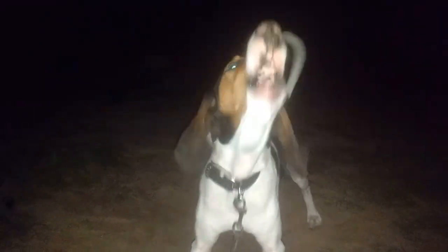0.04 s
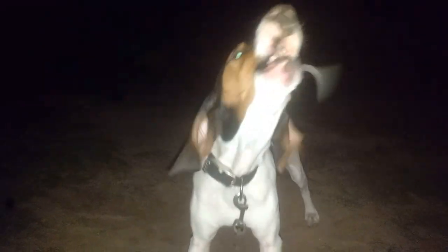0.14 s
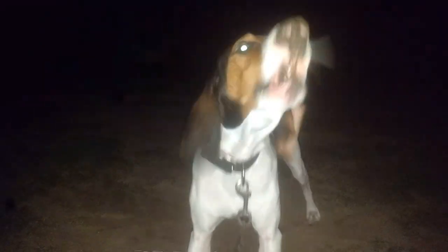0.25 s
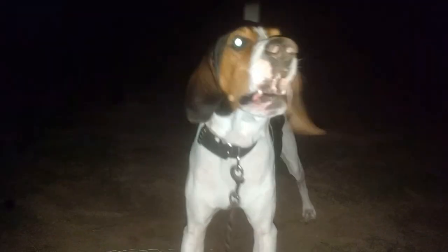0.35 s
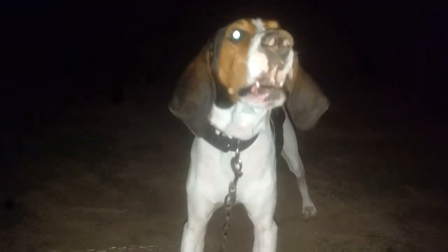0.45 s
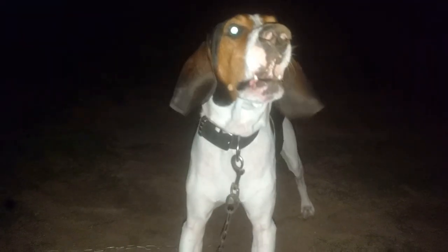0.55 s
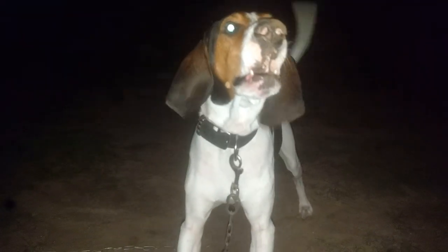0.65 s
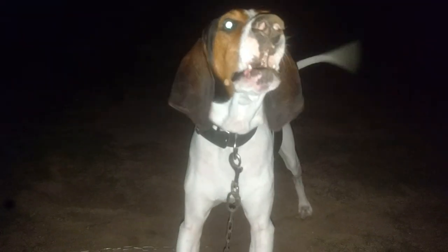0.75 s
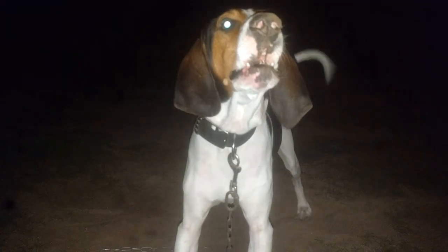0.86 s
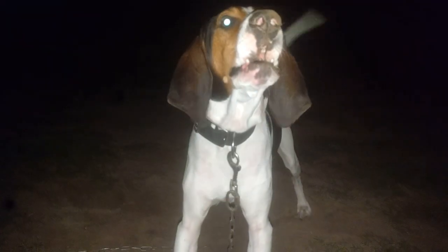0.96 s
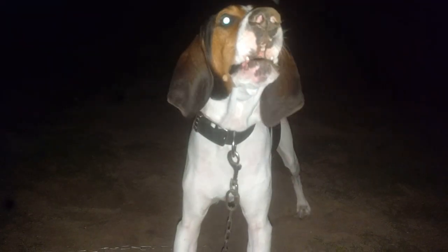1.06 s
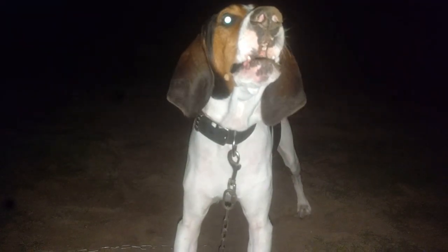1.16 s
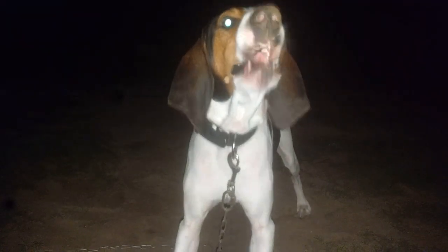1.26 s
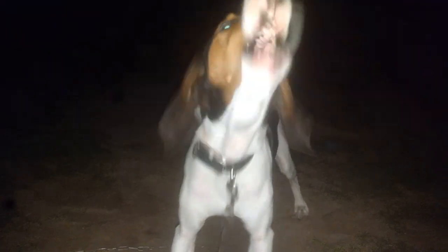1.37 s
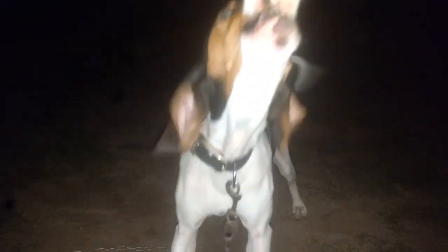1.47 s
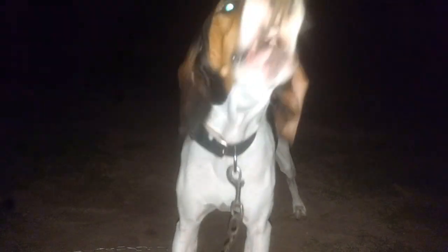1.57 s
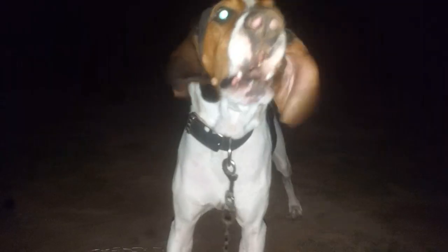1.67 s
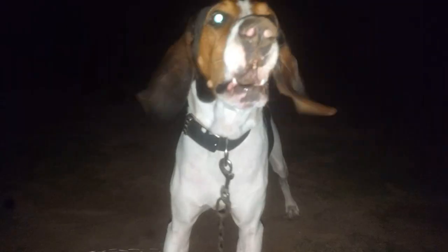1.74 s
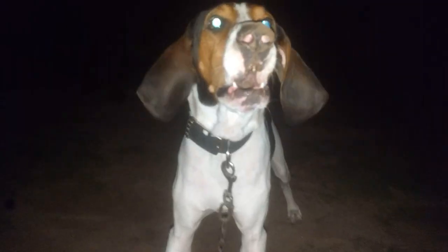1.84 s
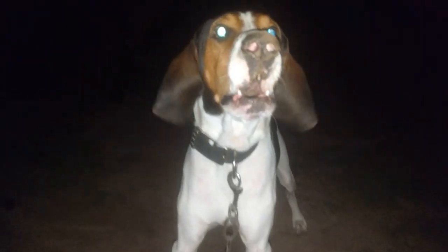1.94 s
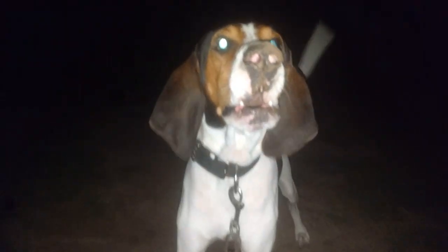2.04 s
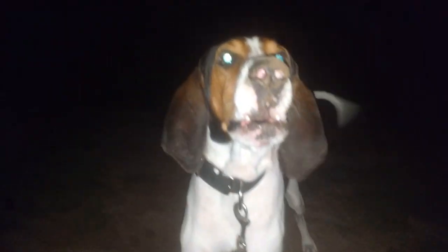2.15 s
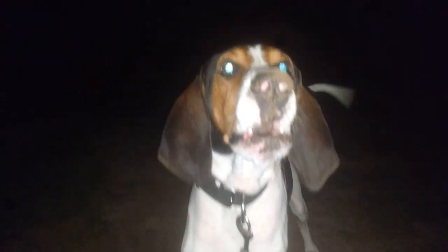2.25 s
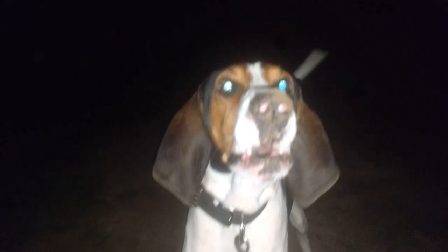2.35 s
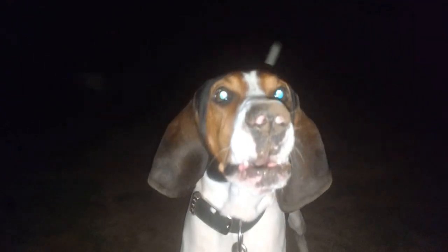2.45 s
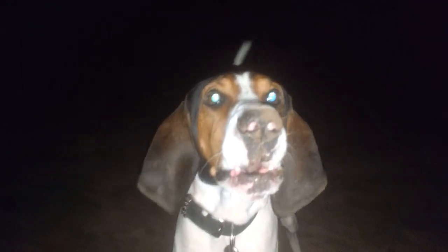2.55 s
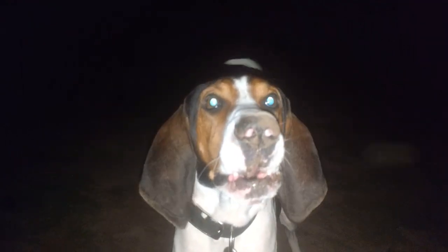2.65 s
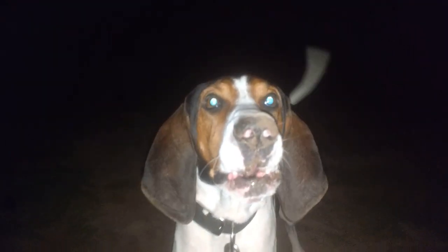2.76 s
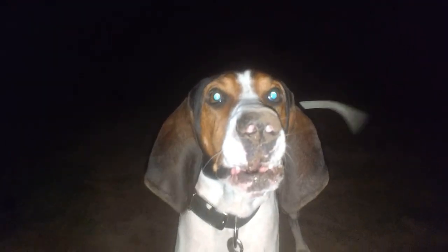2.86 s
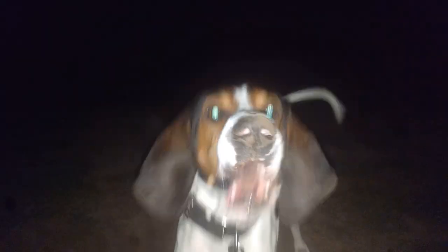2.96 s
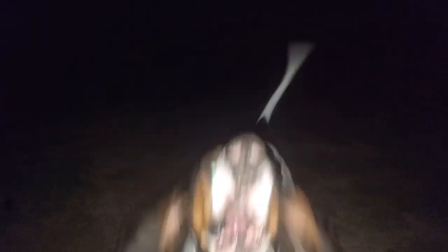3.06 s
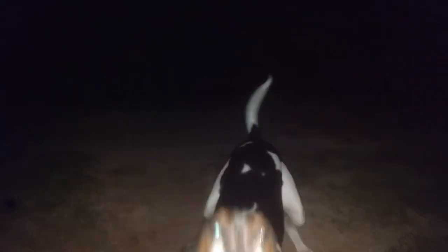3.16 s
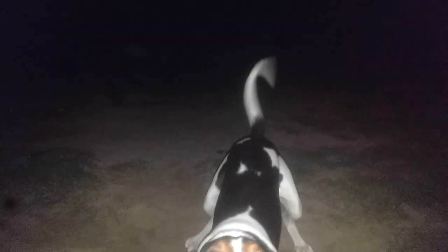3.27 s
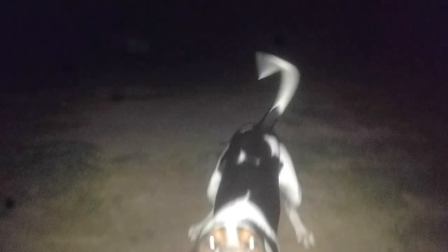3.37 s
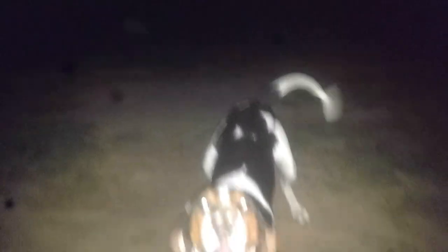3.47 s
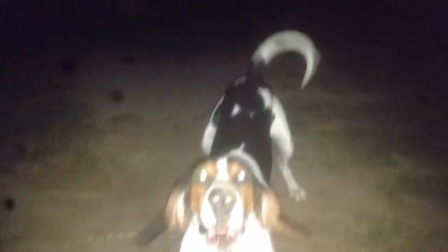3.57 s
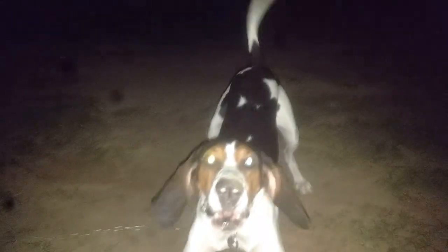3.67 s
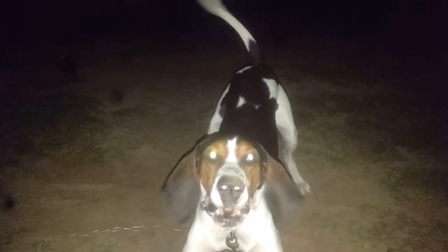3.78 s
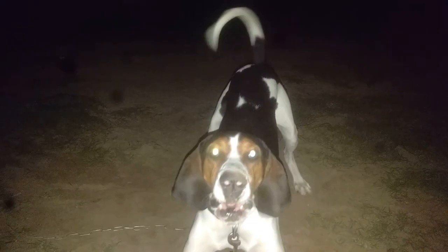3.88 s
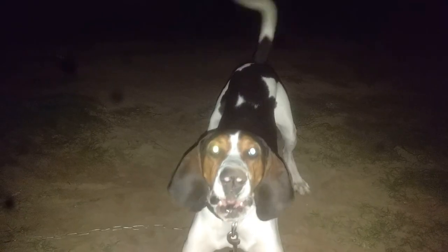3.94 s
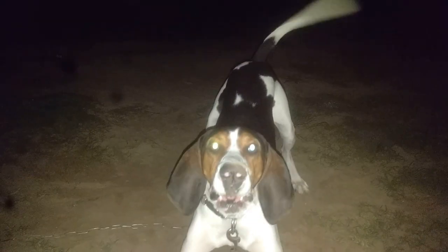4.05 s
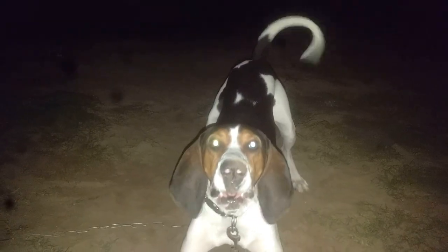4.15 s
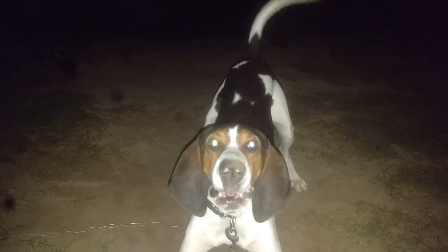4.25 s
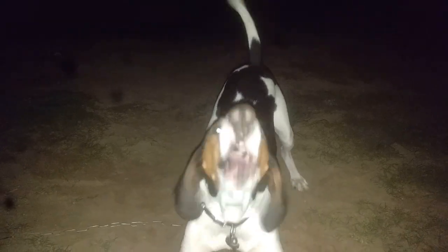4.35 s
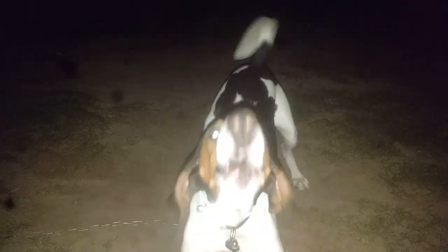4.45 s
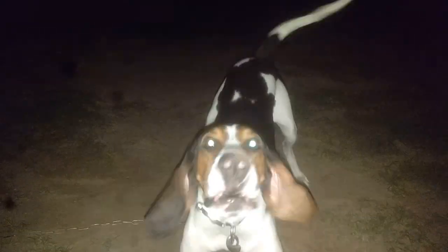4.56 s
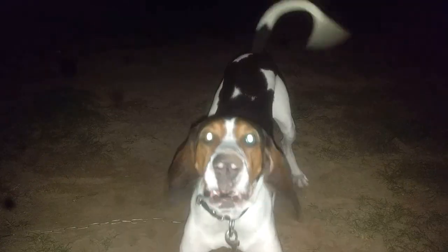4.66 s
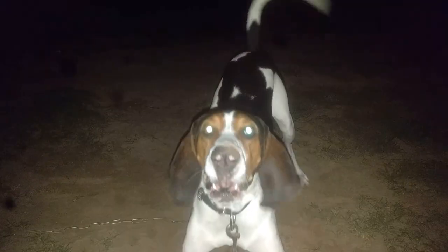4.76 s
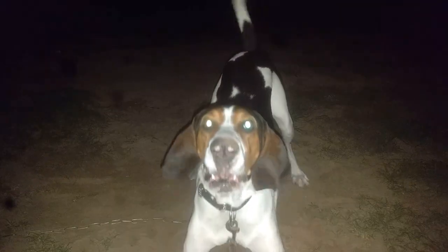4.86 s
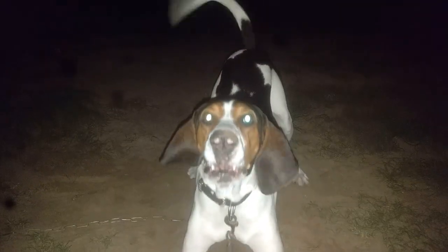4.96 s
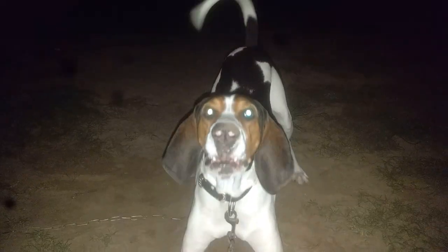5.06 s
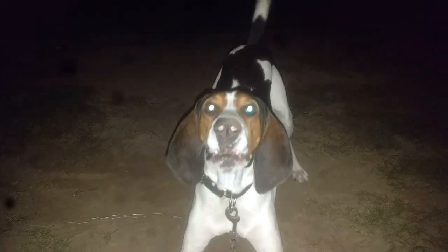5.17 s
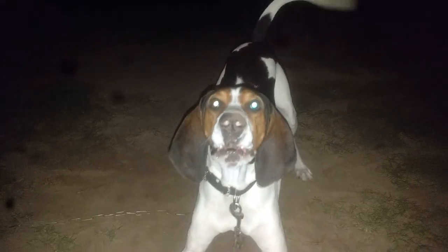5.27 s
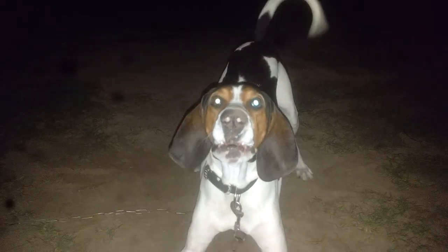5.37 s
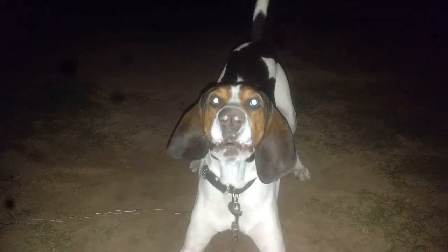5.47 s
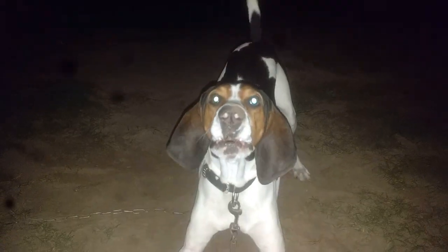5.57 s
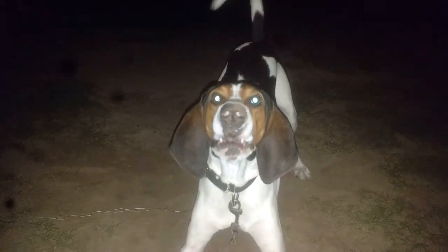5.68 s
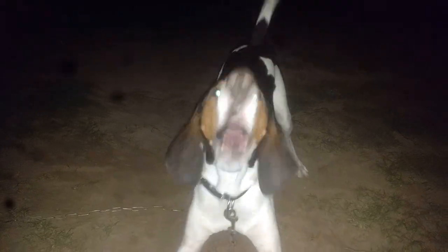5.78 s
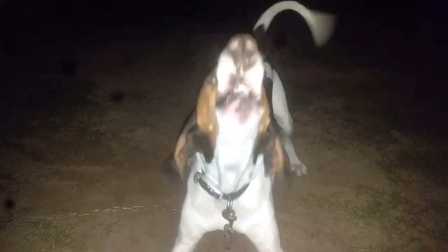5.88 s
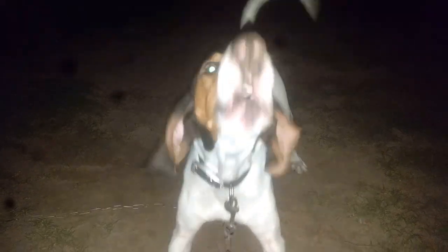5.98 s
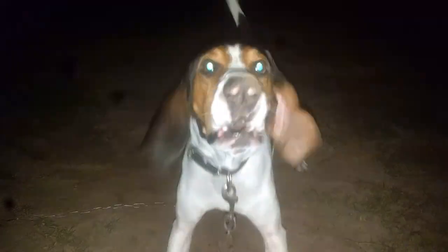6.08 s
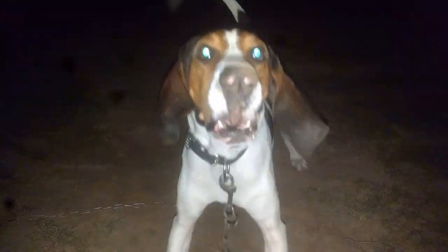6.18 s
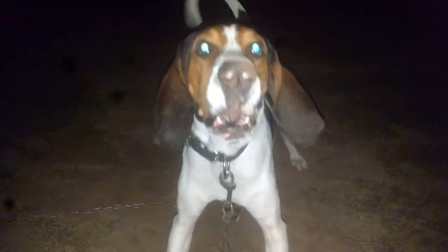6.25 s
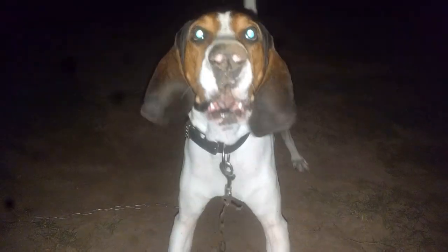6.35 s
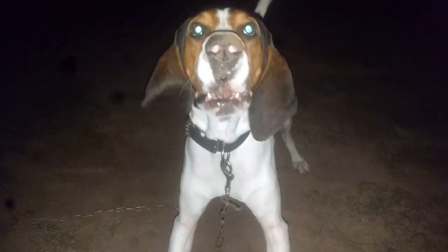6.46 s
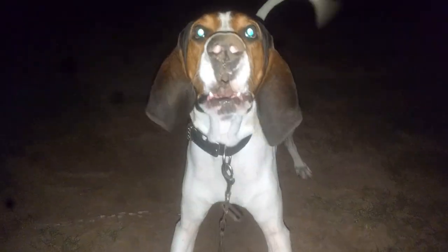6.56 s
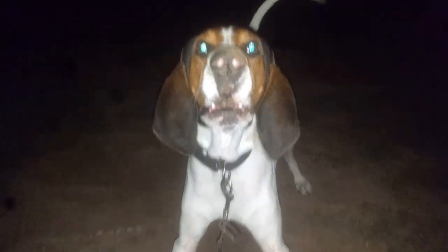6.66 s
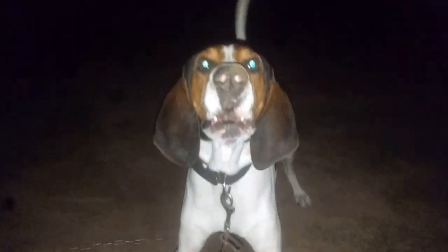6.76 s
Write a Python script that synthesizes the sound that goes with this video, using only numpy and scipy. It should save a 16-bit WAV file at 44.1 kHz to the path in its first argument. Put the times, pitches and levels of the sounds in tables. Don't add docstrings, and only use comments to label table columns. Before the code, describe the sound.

A large dog barks right at the microphone in open night air, with hardly any echo and slight overload on the peaks. Two short barks come first, then the loudest, held as a brief bay, then two more short ones. Between them are small breaths and metallic chain rattles, with quiet shimmering insects and a low distant motor drone underneath.

```python
import sys
import numpy as np
from scipy import signal
from scipy.fft import rfft, irfft, next_fast_len
from scipy.io import wavfile
from scipy.ndimage import uniform_filter1d

SR = 44100
rng = np.random.default_rng(int(sys.argv[2]) if len(sys.argv) > 2 else 0)


def inscribe(sig):
    pcm = np.round(np.clip(np.atleast_2d(sig).T, -1, 1) * 32767)
    wavfile.write(sys.argv[1], SR, pcm.astype(np.int16))


def convert_level_to_amplitude(level_db):
    exponent = np.asarray(level_db, float) / 20
    return 10 ** exponent


N = 300762

# (frequency [Hz], density [dB/Hz])
NIGHT_SPECTRUM = [(18, -48.5), (30, -10), (49, -5.5), (69, -3.5), (87, -2), (130, -9), (164, -10),
                  (231, -10.5), (374, -14), (397, -19), (1000, -18), (3000, -33), (3900, -40), (6600, -120)]
# (frequency [Hz], density [dB/Hz])
CHORUS_SPECTRUM = [(1760, -72), (3000, -33.5), (3520, -25.5), (3730, -2.5), (4030, -11), (4350, -5.5),
                   (4630, -19.5), (5040, -27.5), (5600, -6), (5840, 1.5), (7300, -7.5), (9010, 4),
                   (11300, -9.5), (14300, -3.5), (16000, -5)]
NIGHT_DB, CHORUS_DB = -48, -46.5
# (time [s], level [dB])
MOTOR_DRONE = [(0, -57.5), (5.3, -56.5), (6.05, -53), (6.3, -48), (6.82, -48)]
# (frequency [Hz], width [Hz], level [dB])
MOTOR_BANDS = [(62.6, 1.5, -51.5), (121.7, 30, -56), (238, 5.2, -68.5)]
# (frequency [Hz], width [Hz], level [dB], throb rate [1/s], depth [0-1], start [s], end [s])
INSECTS = [(14600, 1500, -53, 21.5, .95, 2.2, 2.95), (14600, 1500, -58, 21.5, .95, .2, 2.2),
           (5850, 500, -57, 29.5, .95, -1, 8), (6720, 60, -62, 7.3, .9, 2.45, 3.1),
           (6780, 60, -64, 6.1, .9, .5, 1.3)]

# (time [s], peak [dB], upper rings [dB])
LINK_KNOCKS = [(3.228, -23.5, -20.5), (3.621, -32.5, -25), (3.786, -39, -24), (4.665, -39, -18),
               (4.681, -37.5, 17), (4.714, -39, -2), (4.749, -28, 16.5), (4.7787, -33, -3),
               (4.7905, -41, -31), (4.802, -57, -10), (4.869, -47, -15), (4.907, -42, -3), (4.943, -36, 3),
               (4.9462, -24.5, 15), (4.957, -27.5, 23.5), (4.9846, -27.5, -29), (5.971, -34, 12),
               (5.99, -32, -22), (6.027, -30, -33), (6.0493, -30, -22), (6.058, -29, -3),
               (6.066, -23.5, -9), (6.0805, -17.5, 4), (6.117, -31.5, -11), (6.1855, -38, 7),
               (6.2022, -31, 8), (6.223, -37.5, 15), (6.24, -45, 0)]
# (frequency [Hz], level [dB], T60 [s])
LINK_MODES = [(8210, 6, 0.093), (8120, -3.5, 0.15), (9770, -15.5, 0.12), (9700, -39, 0.092),
              (10500, -31, 0.12)]
# (time [s], peak [dB], centre [Hz], width [Hz])
TICKS = [(1.353, 3, 8930, 500), (1.362, 0, 8900, 500), (1.46, -4, 10700, 1200), (2.1966, -17.5, 8600, 5630),
         (2.6007, -28, 8600, 5550), (2.91, -41, 6000, 3980), (6.427, -25, 1610, 1060)]
TICK_DB, TICK_PER_UPPER = -4.5, 0.41

# (start [s], length [s], level [dB])
SIGHS = [
    (0.525, 0.41, -54),
    (1.816, 0.35, -42),
    (3.719, 0.73, -46),
    (6.292, 0.43, -46),
]
# (frequency [Hz], level [dB])
SIGH_SPECTRUM = [(180, -20), (300, 1), (553, -1), (937, -9.5), (1990, -7), (3180, -24), (4360, -7.5),
                 (5390, -22), (5960, -8), (7170, -12.5), (9000, -4.5), (11700, -26), (19800, -120)]
SIGH_SAG_DB_S = 29.5
# (start [s], length [s], peak [dB], pipe whistle [dB], chest [dB])
GULPS = [
    (0.239, 0.15, -37.5, -0.5, 4),
    (1.603, 0.19, -35.5, 2, -4.5),
    (3.601, 0.054, -40.5, 1, 4),
    (4.568, 0.056, -40, 1, 1.5),
    (6.011, 0.057, -38, 0.5, -4.5),
    (6.107, 0.036, -44, -1, 9),
]
# (frequency [Hz], width [Hz], level [dB])
WINDPIPE = [(374, 54, 12), (502, 31, 5.5), (800, 58, 7), (1350, 98, 2), (2150, 104, 5.5),
            (4650, 1200, -5.5), (7500, 1200, -5.5), (8600, 300, -1.5), (9900, 1300, -6.5)]
GULP_RISE_DB_S, GULP_RISE_S, GULP_SAG_DB_S, GULP_FALL_DB_S = 397, 0.034, 44.5, 250
PIPE_START_HZ, PIPE_END_HZ, PIPE_SLIDE_S, PIPE_WOBBLE = 2060, 2158, 0.1, .02

# (time [s], peak [dB], ring [Hz])
CREAKS = [(0.012, 3, 506), (1.3, -25, 373), (1.317, -12, 376), (1.329, -10, 385), (1.342, -1, 378),
          (1.354, 4.5, 530), (3.027, -15, 424), (3.037, -12, 412), (3.048, 7.5, 524), (4.311, -16.5, 385),
          (4.331, -12, 424), (4.343, -10, 463), (4.354, -2, 476), (5.777, -10.5, 436), (5.788, -7, 485),
          (5.797, 0, 509), (5.805, -14, 480), (5.933, -17, 556)]
# (frequency [Hz], level [dB], T60 [s])
CREAK_RINGS = [(378, -18.5, 0.0556), (1200, -28.5, 0.048), (907, -12.5, 0.016), (1674, -17.5, 0.043),
               (2310, -17, 0.06), (2790, -22, 0.02), (4400, -27.5, 0.014), (7000, -29, 0.0092)]
# (time [s], peak [dB], whistle [Hz])
SPURTS = [(0.02, -22.5, 7500), (0.036, -27, 7600), (1.352, -22, 7500), (3.058, -7, 7700),
          (3.068, -6.5, 8200), (3.073, -18.5, 8750), (3.115, -20, 8000), (3.137, -4, 8200),
          (4.312, -35, 8000), (4.331, -33, 8000), (4.342, -30, 7500), (4.352, -17, 7000),
          (4.362, -17, 7350), (4.376, -17, 8600), (4.381, -6, 8500), (4.389, -7.5, 8600), (4.399, -2, 7900),
          (4.407, -7, 7600), (4.431, -7, 7600), (5.788, -31, 7500), (5.798, -19, 7300), (5.807, -23, 5550),
          (5.815, -26, 7500), (5.824, -4.5, 7800), (5.832, -17, 8400), (5.840, -15, 8200),
          (5.847, -7, 8000), (5.859, -24, 7900), (5.892, -15.5, 7800), (5.898, -25, 7900)]
SPURT_T60_S, SPURT_WIDTH_HZ, SPURT_EDGE = 0.016, 900, .35

# (full [s], spent [s], blast [dB], wheeze [dB], second mode [0-1])
BARKS = [
    (0.04, 0.118, -14.5, -25, 1),
    (1.379, 1.454, -14, -25.5, 0.96),
    (3.081, 3.137, -7.5, -18.5, 1),
    (4.374, 4.446, -15, -22, 0.73),
    (5.816, 5.893, -21, -23.5, 0.5),
]
# (top [0-1], held [s], clearing [s])
HOARSE = [
    (.46, 0, .06),
    (.4, 0, .055),
    (.62, .03, .05),
    (.5, 0, .07),
    (.36, 0, .08),
]
MOUTHS = [0.825, 0.828, 0.822, 0.91, 0.823]
HALVES = [0.72, 0.58, 1.05, 0.46, 0.32]
# (time [s], pitch [Hz], effort [dB])
FIRST = [(0, 197.4, -16), (.01, 208, -20), (.014, 216, -8), (.1, 311.2, -7.5), (.126, 305, -9),
         (.158, 294.4, -2.5), (.2, 276, -11), (.229, 186, -19), (.28, 102, -51)]
# (time [s], pitch [Hz], effort [dB])
SECOND = [(1.286, 150, -39), (1.349, 188, -29), (1.357, 195, -12.5), (1.398, 289, -5), (1.437, 316.8, -6),
          (1.482, 291.7, -6.5), (1.544, 291.5, -8), (1.608, 128.4, -28), (1.681, 79, -36)]
# (time [s], pitch [Hz], effort [dB])
THIRD = [(3.02, 167.2, -30), (3.046, 215.6, -36), (3.06, 247.3, -4), (3.1, 291, -6), (3.157, 297, -7.5),
         (3.215, 347.9, -9.5), (3.26, 291, -14)]
# (time [s], pitch [Hz], effort [dB])
BAY = [(3.311, 292.8, -12.5), (3.362, 297.6, -10.5), (3.382, 311.3, -11), (3.389, 330, -17),
       (3.469, 323.7, -13.5), (3.565, 308.9, -13.5), (3.589, 286.3, -17.5), (3.62, 187.3, -23.5),
       (3.68, 89.7, -57)]
# (time [s], pitch [Hz], effort [dB])
FOURTH = [(4.3, 171.7, -46), (4.352, 200, -28), (4.385, 226, -16), (4.403, 241, -7.5), (4.439, 271, -6.5),
          (4.473, 299.4, -10.5), (4.526, 272.4, -9), (4.571, 159.8, -32), (4.631, 88.3, -58)]
# (time [s], pitch [Hz], effort [dB])
FIFTH = [(5.758, 161, -39), (5.799, 236, -25), (5.816, 250, -5), (5.865, 262, -5.5), (5.919, 292.3, -12),
         (5.936, 278, -8.5), (5.997, 266.2, -19), (6.02, 195.3, -21), (6.08, 86, -73)]
CALLS = [FIRST, SECOND, THIRD + BAY, FOURTH, FIFTH]
# (frequency [Hz], level [dB])
THROAT = [(60, -23), (110, -5.5), (200, -16.5), (330, -13.5), (480, 8.5), (640, 8), (800, -1.5), (960, -8),
          (1200, 2), (1340, -20), (1500, -10.5), (1630, -13.5), (1780, -3.5), (1900, -21), (2050, -63),
          (2400, -65), (3700, -72.5), (4100, -39), (4400, -21.5), (4800, -29.5), (5400, -54)]
# (frequency [Hz], level [dB])
RASP_SPECTRUM = [(140, -67.5), (230, -48.5), (280, -29.5), (348, -9), (414, -12), (464, -7), (571, -8.5),
                 (854, -15.5), (1060, -21), (1310, -25), (1910, -27), (2100, -28.5), (2640, -46),
                 (3600, -36.5), (4680, -47), (7920, -120)]
# (frequency [Hz], level [dB])
BLAST_SPECTRUM = [(1760, -26), (3000, -12.5), (3430, -31), (4600, -9.5), (6480, -7.5), (7000, -2),
                  (8340, -2), (10300, -14.5), (12500, -23), (15100, -23.5), (16000, -45.5)]
# (frequency [Hz], level [dB])
WHEEZE_SPECTRUM = [(1880, -58.5), (2600, -56.5), (3000, -25), (3700, -21), (4300, -16), (5100, -17.5),
                   (5900, -9), (6700, -17), (8300, -12.5), (9500, -21), (10300, -28), (11000, -25.5),
                   (12700, -29), (13700, -33.5), (14400, -30.5), (15500, -39.5)]
# (frequency [Hz], width [Hz], level [dB], effort slope [dB/dB])
HEAD_CAVITIES = [(4387, 670, -6, 0.61), (5470, 330, -20.5, 0.44), (5970, 360, -10, .4),
                 (7600, 170, -9.5, .4), (8450, 340, -6.5, .5), (9360, 290, -13.5, 0.18)]
HEAD_DRIFT, HEAD_FLICKER_DB = .02, 3.5

BLAST_RISE_DB_S, BLAST_SAG_DB_S, BLAST_DROP_DB_S, WHEEZE_FOLLOWS = 692, 81, 711.5, 0.34
PUFF_DB, PUFF_FADE_DB_S, PUFF_END_DB = -27.5, 142, -41
SLACK_HZ, SLACK_SPAN_HZ = 246, 144.4
HALF_END, HALF_S = 0.45, 0.037
ROUGH_END, ROUGH_REST = .25, .018
SECOND_HZ, SECOND_LIFT_HZ = 376, 60.09
SECOND_IDLE, SECOND_END, SECOND_RISE_S = 0.61, 2.2, 0.029
SECOND_HOLD_S, SECOND_FALL_S, SECOND_LINGERS, SECOND_DIES_S = .095, .025, .2, .12
BEATING = 0.35
SWING, SWING_TWICE = .55, .28
MOUTH_HELD, MOUTH_SHUT, MOUTH_STRAIN = 0.97, 0.3, 0.016
STRAIN_HZ, STRAIN_DB = 302.8, 7
VEIL_DB, VEIL_TOP_DB = 5, 9
TONGUE_START_HZ, TONGUE_END_HZ, TONGUE_DB = 1540, 1097, -11


def evened(x):
    return x / np.sqrt(np.mean(x ** 2) + 1e-20)


def read(points, hz):
    f, value = np.transpose(points)
    return np.interp(np.log(hz + 1), np.log(f + 1), value)


def add(mix, s, sound):
    part = mix[round(s * SR):][:len(sound)]
    part += sound[:len(part)]


def ramp(t, s, length):
    return np.clip((t - s) / length, 0, 1)


def colour(x, points):
    size = next_fast_len(len(x))
    gains = convert_level_to_amplitude(read(points, np.fft.rfftfreq(size, 1 / SR)))
    return evened(irfft(rfft(x, size) * gains, size)[:len(x)])


def resonate(x, hz, width):
    turn = np.exp(2j * np.pi * np.cumsum(hz * np.ones(len(x))) / SR)
    r = np.exp(-np.pi * width / SR)
    return 2 * (turn * signal.lfilter([(1 - r) ** 2], [1, -2 * r, r * r], x / turn)).real


def wander(size, hz):
    lowpass = signal.butter(3, hz, fs=SR, output="sos")
    chance = signal.sosfilt(lowpass, rng.standard_normal(size + 8000))
    return np.clip(evened(chance[8000:]), -2.5, 2.5)


def patchy(x, db, bins, frames):
    z = signal.stft(x, nperseg=512)[2]
    patches = uniform_filter1d(rng.standard_normal(z.T.shape).T, bins, 0)
    patches = evened(uniform_filter1d(patches, frames, 1))
    return evened(signal.istft(z * convert_level_to_amplitude(db * patches), nperseg=512)[1][:len(x)])


def night():
    t, frames = np.arange(N) / SR, N // 256 + 5
    a, b, patches = rng.standard_normal((frames, 513, 3)).T
    patches = evened(uniform_filter1d(uniform_filter1d(patches, 10, 0), 12, 1))
    wash = signal.istft((a + 1j * b) * convert_level_to_amplitude(1.2 * patches), nperseg=1024, noverlap=768)[1][:N]
    out = convert_level_to_amplitude(NIGHT_DB - 3.5) * colour(wash, NIGHT_SPECTRUM)
    out += convert_level_to_amplitude(CHORUS_DB) * colour(wash, CHORUS_SPECTRUM)
    drone = np.sqrt(2) * np.sin(2 * np.pi * 144 * t + 2.5 * wander(N, 2.5))
    out += convert_level_to_amplitude(np.interp(t, *np.transpose(MOTOR_DRONE))) * drone
    for hz, width, db in MOTOR_BANDS:
        out += convert_level_to_amplitude(db) * evened(resonate(rng.standard_normal(N), hz, width))
    for hz, width, db, rate, depth, start, end in INSECTS:
        throb = 1 - depth * (.5 + .5 * np.cos(2 * np.pi * rate * t + 0.51 * wander(N, 3)))
        singing = np.clip(np.minimum(t - start, end - t) / 0.022, 0, 1)
        out += convert_level_to_amplitude(db) * evened(resonate(rng.standard_normal(N), hz, width)) * throb * singing
    return out


def yard(x):
    t = np.arange(SR // 2) / SR
    taps = rng.standard_normal(len(t)) * convert_level_to_amplitude(-51.0 - 60 * t / .5) * (t > .01)
    band = signal.butter(2, [300, 2600], "band", fs=SR)
    return signal.fftconvolve(x, signal.lfilter(*band, taps))[:N]


def chain():
    out, t = np.zeros(N), np.arange(6000) / SR
    gaps = np.diff(np.transpose(LINK_KNOCKS)[0], append=N / SR)
    phases = rng.random((len(LINK_KNOCKS), len(LINK_MODES)))
    for (s, db, upper_db), gap, phase in zip(LINK_KNOCKS, gaps, phases):
        ring = sum(convert_level_to_amplitude(g + upper_db * (hz > 9000) - 50 * t / t60) * np.sin(2 * np.pi * (hz * t + p))
                   for (hz, g, t60), p in zip(LINK_MODES, phase))
        ring *= 1 - 0.82 * ramp(t, gap, 0.0018)
        chirp = np.sin(2 * np.pi * 8000 * t * (1 + 90 * t))
        tick = convert_level_to_amplitude(TICK_DB + TICK_PER_UPPER * upper_db - 60 * t / 0.0031) * chirp
        add(out, s, convert_level_to_amplitude(db) * (0.86 * ring * np.minimum(t / 0.00042, 1) + tick))
    for (s, db, hz, width), noise in zip(TICKS, rng.standard_normal((len(TICKS), 600))):
        burst = noise * convert_level_to_amplitude(-60 * t[:600] / 0.02)
        edge = 0.27 * width / hz * np.diff(burst, prepend=0)
        add(out, s, convert_level_to_amplitude(db - 1.5) * (resonate(burst, hz, width) + edge))
    return out


def sigh(row):
    s, length, db = row
    t = np.arange(0, length, 1 / SR)
    air = convert_level_to_amplitude(1.1 * wander(len(t), 36)) * rng.standard_normal(len(t))
    fade = signal.windows.tukey(len(t), .35)
    return s, convert_level_to_amplitude(db - SIGH_SAG_DB_S * t) * colour(air, SIGH_SPECTRUM) * fade


def gulp(row):
    s, length, peak_db, pipe_db, chest_db = row
    t = np.arange(0, length + 0.17, 1 / SR)
    db = (peak_db - GULP_RISE_DB_S * np.maximum(GULP_RISE_S - t, 0) - GULP_SAG_DB_S * t
          - GULP_FALL_DB_S * np.maximum(t - length, 0))
    pipe_hz = PIPE_START_HZ + (PIPE_END_HZ - PIPE_START_HZ) * ramp(t, GULP_RISE_S, PIPE_SLIDE_S)
    slide = pipe_hz / WINDPIPE[4][0]
    air = patchy(rng.standard_normal(len(t)), 2.8, bins=3, frames=10)
    tube = np.zeros(len(t))
    for hz, width, db_mode in WINDPIPE:
        gain = convert_level_to_amplitude(db_mode + pipe_db * (2000 < hz < 3000) + chest_db * (hz < 1000)) * np.sqrt(width)
        moving_hz = hz * slide ** (hz > 1000) * (1 + PIPE_WOBBLE * wander(len(t), 25))
        tube += gain * evened(resonate(air, moving_hz, width))
    tube = evened(tube) + .45 * evened(resonate(air, 1400, 1290))
    return s, convert_level_to_amplitude(db + 8.0) * tube * signal.windows.tukey(len(t), .1)


def creak(row):
    s, db, hz = row
    t = np.arange(2200) / SR
    ring = np.cos(2 * np.pi * hz * t) * convert_level_to_amplitude(-60 * t / 0.023)
    ring += sum(convert_level_to_amplitude(g - 60 * t / t60) * np.cos(2 * np.pi * f * t) for f, g, t60 in CREAK_RINGS)
    return s, convert_level_to_amplitude(db - 7.5) * ring * np.minimum(t / 0.00045, 1)


def spurt(row):
    s, db, hz = row
    t = np.arange(700) / SR
    jet = rng.standard_normal(len(t))
    sound = evened(resonate(jet, hz, SPURT_WIDTH_HZ)) + SPURT_EDGE * colour(jet, BLAST_SPECTRUM)
    return s, convert_level_to_amplitude(db + 3.0 - 60 * t / SPURT_T60_S) * sound * np.minimum(t / 0.001, 1)


def larynx(t, hz, spent, strength, hoarse, gape, halves):
    slack = np.clip((SLACK_HZ - hz) / SLACK_SPAN_HZ, 0, 1)
    late = ramp(t, spent, SECOND_RISE_S)
    top, held, clearing = hoarse
    rough = top * np.exp(-np.maximum(t - spent - held + 0.012, 0) / clearing) + ROUGH_END * slack * late
    half = halves * (1 - ramp(t, spent - .01, HALF_S)) + HALF_END * slack
    linger = SECOND_LINGERS * np.exp(-np.maximum(t - spent - SECOND_HOLD_S, 0) / SECOND_DIES_S)
    held_on = np.maximum(1 - ramp(t, spent + SECOND_HOLD_S, SECOND_FALL_S), linger)
    ringing = np.maximum(strength * late * held_on, SECOND_END * slack * late)
    second = SECOND_IDLE * strength * (1 - late) + ringing
    mouth = gape + (MOUTH_HELD - gape) * late - MOUTH_SHUT * slack
    mouth -= MOUTH_STRAIN * ramp(hz, STRAIN_HZ, 23)
    return rough, half, second, mouth, slack * late


def fold_lines(hz, turns, rough, half, second, mouth):
    k = np.arange(1, 35)[:, None] / 2
    sway = 1 + .01 * wander(len(hz), 8)
    gains = convert_level_to_amplitude(read(THROAT, k * hz / (mouth * sway))) * np.where(k % 1, half, 1)
    gains[6:] *= convert_level_to_amplitude(-VEIL_DB * (rough + second))
    gains[8:] *= convert_level_to_amplitude(-VEIL_TOP_DB * np.clip(2.5 * second - .3, 0, 1))
    gains[5:] *= convert_level_to_amplitude(-STRAIN_DB * ramp(hz, STRAIN_HZ + 6, 12.2))
    gains[1] *= convert_level_to_amplitude(5.5 + 5.9 * second + 4.3 * rough)
    gains[0] *= convert_level_to_amplitude(4.4 + 4 * second)
    lines = (gains * np.cos(2 * np.pi * k * turns - 0.621 * k ** 2)).sum(0)
    return lines / np.sqrt((gains ** 2).sum(0) / 2)


def coupled_folds(lines, second_turns, beat, second, closing):
    swung = np.clip(second, 0, 1) * (1 - closing) ** 2
    lines = lines * (1 + swung * (SWING * np.cos(beat) + SWING_TWICE * np.cos(2 * beat + 1)))
    other = np.cos(2 * np.pi * second_turns)
    overtones = 0.36 * np.cos(4 * np.pi * second_turns + 1) + 0.2 * np.cos(6 * np.pi * second_turns + 2)
    folds = lines + second * (1.29 * other + overtones + 0.58 * resonate(lines * other, 930, 430))
    return folds / np.sqrt(1 + second ** 2)


def rasp(t, gate, air, rough, full, spent):
    grain = patchy(rng.standard_normal(len(t)), 4, bins=2, frames=8)
    out = colour(np.sqrt(abs(gate)) * grain, RASP_SPECTRUM)
    third_resonance = evened(resonate(air, 2230, 200))
    out += 0.077 * third_resonance * (1 - 1.1 * ramp(t, full, 0.084))
    tongue_hz = np.interp(t, [full, spent + 0.0092], [TONGUE_START_HZ, TONGUE_END_HZ])
    tongue = evened(resonate(gate * air, tongue_hz, 190))
    out += convert_level_to_amplitude(TONGUE_DB) * tongue * (1 - ramp(t, spent, 0.0098))
    dull = resonate(out, 570, 3000)
    return dull + np.clip(2.8 * rough - .35, 0, 1) * (out - dull)


def hiss(turns, gate, air, rough, voice_db):
    size = len(turns)
    wide = np.clip(2.2 * rough - .3, 0, 1)
    slaps = evened(np.diff(np.floor(turns), prepend=0))
    streaks = gate * patchy(air, 3.5, bins=2, frames=14) + .45 * slaps
    streaks += 1.1 * (1 - rough) * resonate(slaps, 4400, 1100)
    clumps = patchy(air, 6.1, bins=5, frames=4)
    whistles = np.zeros(size)
    for hz, width, db, follows in HEAD_CAVITIES:
        effort_db = follows * np.clip(voice_db + 13.5, -15, 4)
        gain = convert_level_to_amplitude(db + effort_db + HEAD_FLICKER_DB * wander(size, 29.0))
        drifting_hz = hz * (1 + HEAD_DRIFT * wander(size, 3.95))
        whistles += gain * evened(resonate(streaks, drifting_hz, width))
    wheeze = 0.2 * colour(streaks, WHEEZE_SPECTRUM) + 0.28 * whistles
    blast = colour(gate * (clumps + 0.32 * slaps), BLAST_SPECTRUM)
    return np.sqrt(wide) * blast + np.sqrt(1 - wide) * wheeze


def bark(call, row, hoarse, gape, halves):
    call_s, call_hz, call_db = np.transpose(call)
    full, spent, blast_db, wheeze_db, strength = row
    t = np.arange(call_s[0], call_s[-1], 1 / SR)
    hz, voice_db = np.interp(t, call_s, call_hz), np.interp(t, call_s, call_db)
    rough, half, second, mouth, closing = larynx(t, hz, spent, strength, hoarse, gape, halves)
    blast_db = (blast_db - BLAST_RISE_DB_S * np.maximum(full - t, 0)
                - BLAST_SAG_DB_S * np.maximum(t - full, 0) - BLAST_DROP_DB_S * np.maximum(t - spent, 0))
    wheeze_flow = convert_level_to_amplitude(wheeze_db + WHEEZE_FOLLOWS * voice_db) * ramp(t, full - .022, .02)
    flow = np.hypot(convert_level_to_amplitude(blast_db), wheeze_flow * (1 - 0.1 * closing))
    push = convert_level_to_amplitude(PUFF_DB - PUFF_FADE_DB_S * abs(t - full)) + convert_level_to_amplitude(PUFF_END_DB) * closing ** 2

    hz, rough = uniform_filter1d(hz, size=400), np.clip(rough + ROUGH_REST, 0, 1)
    turns = np.cumsum(hz * (1 + (.003 + .035 * rough) * wander(len(t), 40))) / SR
    second_hz = SECOND_HZ + SECOND_LIFT_HZ * (1 - ramp(t, spent - .005, 0.02866))
    second_turns = np.cumsum(second_hz * (1 + 0.0257 * wander(len(t), 44))) / SR
    beat = 2 * np.pi * (second_turns - turns)
    lines = fold_lines(hz, turns, rough, half, second, mouth)
    folds = coupled_folds(lines, second_turns, beat, second, closing)

    weak = 1 - 2.15 * np.minimum(half, .6) * (turns % 2 > 1)
    gate = 1.26 + np.exp(-(turns % 1) / .28) * weak
    gate *= 1 + np.clip(BEATING * second, 0, 1) * np.cos(beat)
    air = convert_level_to_amplitude(.8 * wander(len(t), 40)) * rng.standard_normal(len(t))
    voice = np.sqrt(1 - rough) * folds + rough * rasp(t, gate, air, rough, full, spent)
    puff = evened(resonate(rng.standard_normal(len(t)), 110, 78))
    total = convert_level_to_amplitude(voice_db) * voice + flow * hiss(turns, gate, air, rough, voice_db) + push * puff
    return call_s[0], total * signal.windows.tukey(len(t), .03)


def scene():
    dog = np.zeros(N)
    barks = map(bark, CALLS, BARKS, HOARSE, MOUTHS, HALVES)
    breaths = [*map(sigh, SIGHS), *map(gulp, GULPS)]
    for s, sound in [*breaths, *map(creak, CREAKS), *map(spurt, SPURTS), *barks]:
        add(dog, s, sound)
    loud_db = 10 * np.log10(abs(uniform_filter1d(dog ** 2, 2500)) + 1e-12)
    duck = convert_level_to_amplitude(-.8 * np.maximum(loud_db + 34, 0))
    return (dog + yard(dog) + chain() + duck * night())[None]


def band_limit(x):
    return signal.sosfilt(signal.butter(12, 16820, fs=SR, output="sos"), x)


def record(dry):
    thin = signal.sosfilt(signal.butter(2, 38, "high", fs=SR, output="sos"), dry)
    clipped = thin / (1 + abs(thin / .7) ** 24) ** (1 / 24)
    edge = signal.firwin(301, 15900, window=("kaiser", 9), fs=SR)
    mix = signal.oaconvolve(clipped, edge[None], "same")
    return band_limit(mix)


dry = scene()
out = record(dry)
inscribe(out)
```